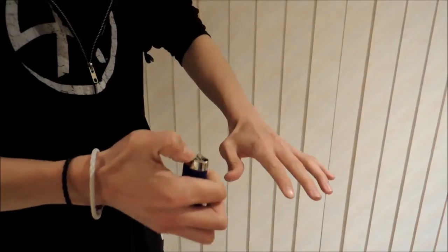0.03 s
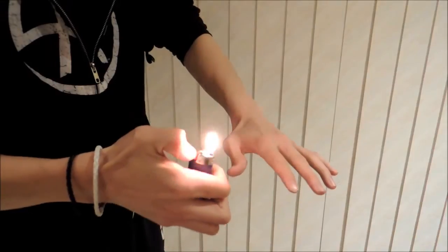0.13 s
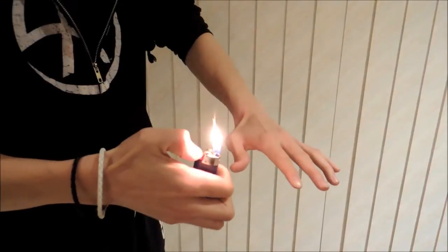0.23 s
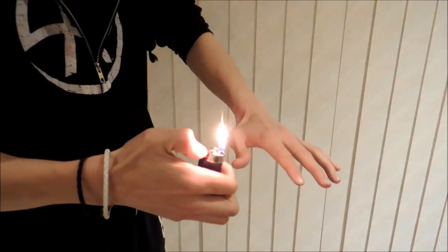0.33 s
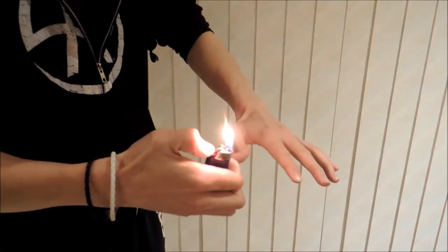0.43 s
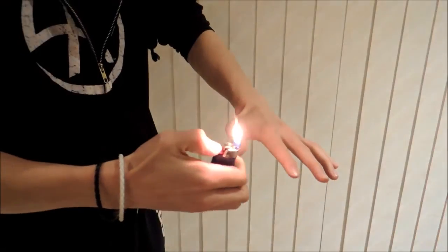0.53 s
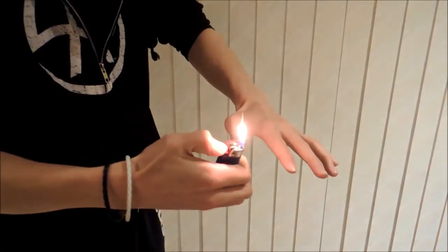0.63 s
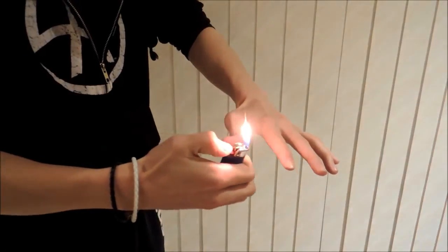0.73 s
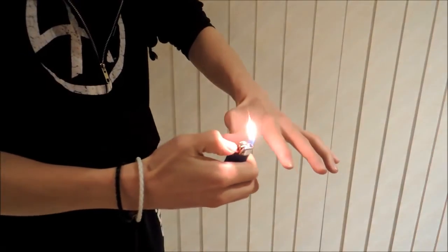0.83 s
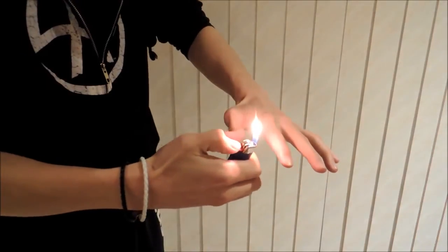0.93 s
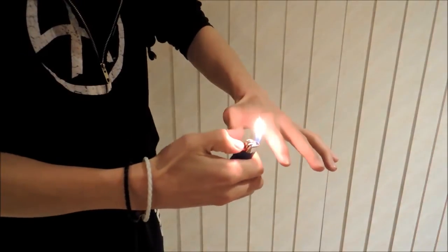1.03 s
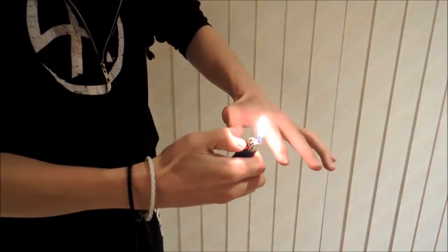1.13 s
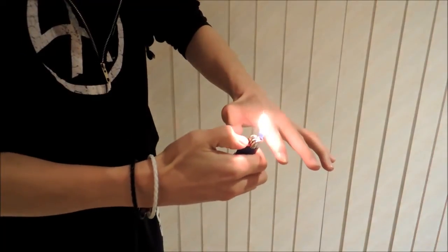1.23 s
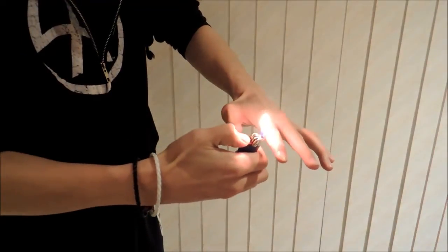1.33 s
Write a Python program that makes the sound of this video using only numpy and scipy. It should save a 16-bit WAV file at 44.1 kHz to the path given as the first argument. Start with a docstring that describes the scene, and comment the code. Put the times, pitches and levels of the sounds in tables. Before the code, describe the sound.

A thumb spins a lighter's spark wheel once near the start: a very short, bright, gritty rasp with a dull knock, then faint ticks and a soft hiss, close stereo microphone, small humming room.

```python
"""A small room, with a stereo microphone close to a lighter whose spark wheel a thumb spins once.
The teeth rasp over the flint in a few quick catches: swelling sines over noise, and grit that rings the hood.
A dull knock, a hollow ring, faint lever ticks (noise bursts) and a short faint hiss go with it.
Mains partials and banded room noise run throughout; faint short pitched blips, sines, sound further away."""
import sys
import numpy as np
from scipy import signal
from scipy.fft import rfft, irfft
from scipy.io import wavfile
from scipy.ndimage import uniform_filter1d

SR = 44100
rng = np.random.default_rng(int(sys.argv[2]) if len(sys.argv) > 2 else 0)


def transcribe(signal):
    """Save signal, clipped to [-1, 1], as a 16-bit WAV file at the path in sys.argv[1]."""
    frames = np.atleast_2d(signal).T
    limited = np.clip(frames, -1, 1)
    pcm = np.round(limited * 32767).astype(np.int16)
    wavfile.write(sys.argv[1], SR, pcm)


def level_to_linear(level):
    """Convert decibel levels to linear amplitude factors, elementwise."""
    exponent = np.asarray(level, float) / 20
    return 10 ** exponent


N = 61740


def at_hz(points, hz):
    """Read a spectrum on a log-frequency axis."""
    points = np.array(points)
    return np.interp(np.log(hz), np.log(points[:, 0]), points[:, 1])


def rms_one(x):
    """Scale to rms 1."""
    return x / np.sqrt(np.mean(x ** 2) + 1e-20)


def drift(rate_hz):
    """Slow random wander of rms about 1: noise through two equal poles, computed at every 40th sample."""
    r = np.exp(-2 * np.pi * rate_hz * 40 / SR)
    white = rng.standard_normal(N // 40 + 2002)
    slow = signal.lfilter([1], [1, -2 * r, r * r], white)[2000:]  # settled part only
    return np.interp(np.arange(N) / 40, np.arange(len(slow)), rms_one(slow))


def ring(clicks, hz, t60_s):
    """A two-pole resonator: a unit click sets a dying sine of starting height 1 ringing."""
    r = 10 ** (-3 / (t60_s * SR))
    w = 2 * np.pi * hz / SR
    return signal.lfilter([0, np.sin(w)], [1, -2 * r * np.cos(w), r * r], clicks + 1e-18)


def high_pass(x, hz):
    """Fourth-order high-pass."""
    return signal.sosfilt(signal.butter(4, hz, "high", fs=SR, output="sos"), x)


def pan(db):
    """Left and right gains that differ by db, left louder when positive."""
    return level_to_linear(db * np.array([[.5], [-.5]]))


def bands(gain, alike_at):
    """Half-octave bands of stereo noise, each with the gain and left-right likeness given for its pitch."""
    edges = 22 * 2 ** np.arange(0, 9.6, .5)
    white = rng.standard_normal((2, 2, N))
    out = 0
    for k, (low, high) in enumerate(zip(edges, edges[1:])):
        band = signal.butter(2, [low, high], "band", fs=SR, output="sos")
        mid, side = signal.sosfilt(band, white[k % 2])  # neighbouring bands take different noise
        hz = np.sqrt(low * high)
        alike = np.clip(alike_at(hz), 0, 1)
        stereo = np.sqrt(1 + alike) * mid + np.sqrt(1 - alike) * side * [[1], [-1]]
        out = out + gain(hz) * stereo
    return out


def spark_wheel():
    """Teeth catch and drag on the flint: pressure swells drive squeal, rasping noise and grit ringing the hood."""
    # Wheel teeth catching the flint. Each row: centre in seconds, swell height in relative dB,
    # squeal pitch in Hz, length in seconds (two standard deviations of the swell).
    catches = [(.2215, -33, 8600, .002), (.2248, -18, 8800, .0014), (.2275, -3.5, 8500, .0014),
               (.2297, 0, 8250, .0017), (.2319, -4, 11700, .0007), (.2340, -4, 12700, .0009),
               (.2362, -8, 6900, .0009)]
    # Resonances of wheel and metal hood under the grit. Each row: pitch in Hz, relative level in dB, t60 in seconds.
    hood = [(2950, -14, .005), (4600, -7, .002), (7000, 1.5, .003), (9600, -3, .002), (11600, 5, .002),
            (13200, 6, .002)]
    # The steady drag between catches, one row: start, full pressure and stop, all in seconds.
    drag_times = (.2175, .2285, .2372)
    drag_db, drag_rise_db = -1.5, 30.5
    squeal_wobble = .015  # share of the pitch
    rasp_db, rasp_side_db, rasp_low_hz = -14, -13, 2840
    grit_db, grit_spread_db, grit_per_s = -23, 1.7, 9000

    t = np.arange(N) / SR
    start, full, stop = drag_times
    still_to_rise = np.clip((full - t) / (full - start), 0, 1)
    pressure = level_to_linear(drag_db - drag_rise_db * still_to_rise) * (t > start) * (t < stop)
    squeal = np.zeros(N)
    for s, db, hz, length in catches:
        swell = level_to_linear(db) * np.exp(-.5 * ((t - s) / (.5 * length)) ** 2)
        wobble = 1 + squeal_wobble * np.sin(2 * np.pi * (t / (2 * length) + rng.random()))
        squeal += swell * np.sin(2 * np.pi * (np.cumsum(hz * wobble) / SR + rng.random()))
        pressure += swell

    rubbing = pressure * rng.standard_normal((2, N))
    rasp, side = level_to_linear(rasp_db) * high_pass(rubbing, rasp_low_hz)
    for hz, db, t60_s in hood:
        hits = rng.random(N) < grit_per_s / SR
        grit = hits * rng.choice([-1, 1], N) * level_to_linear(grit_spread_db * rng.exponential(1, N))
        rasp = rasp + level_to_linear(grit_db + db) * high_pass(ring(pressure * grit, hz, t60_s), .7 * hz)
    return squeal, rasp, level_to_linear(rasp_side_db) * side


def thumb():
    """One click sets off a dull knock of the plastic body, and a hollow body in the room that rings on."""
    click = np.zeros(N)
    click[int(.2291 * SR)] = 1
    knock = high_pass(ring(click, hz=900, t60_s=.0045), 70)
    hollow = ring(click, hz=1353, t60_s=.7)
    return level_to_linear(-9.5) * knock, level_to_linear(-45.5) * hollow


def ticks():
    """Dry ticks of the lever: sub-millisecond bursts of random-sign noise with the lows removed."""
    # Lever ticks. Each row: start in seconds, starting level in dB ahead of the high-pass.
    tick_starts = [(0.385, -31), (0.3985, -27), (0.4035, -29), (0.6249, -35), (0.7234, -30)]
    decay_s, low_hz = .00014, 5500  # decay to 1/e
    t = np.arange(N) / SR
    shape = np.zeros(N)
    for s, db in tick_starts:
        shape += level_to_linear(db) * (t >= s) * np.exp(-np.maximum(t - s, 0) / decay_s)
    return high_pass(shape * rng.choice([-1, 1], N), low_hz)


def puff():
    """One short hiss: high-passed noise that starts at once and dies exponentially."""
    start_s, start_db, t60_s, low_hz = .974, -46, .21, 10000
    t = np.arange(N) / SR
    shape = level_to_linear(start_db - 60 * np.maximum(t - start_s, 0) / t60_s) * (t >= start_s)
    return high_pass(shape * rng.standard_normal(N), low_hz)


def two_ports(x):
    """The right port hears a close source slightly later, duller and softer."""
    lag_us, dull_db_per_khz = 6, .1
    hz = np.arange(N // 2 + 1) * SR / N
    lag = np.exp(-2j * np.pi * hz * lag_us * 1e-6)
    right = irfft(rfft(x) * lag * level_to_linear(-dull_db_per_khz * hz / 1000), N)
    return np.array([x, right]) * pan(1.5)


def blips():
    """Distant sines hold briefly and leave a faint ring, the higher the more blurred; many weak ones are random."""
    # Placed blips. Each row: start in seconds, peak level in dB at the source, pitch in Hz, length in seconds.
    placed = [(0.115, -53.5, 2420, 0.018), (0.474, -59.5, 4340, .016), (0.521, -51, 1580, 0.011),
              (0.6, -60, 2220, 0.026), (0.609, -47.5, 1134, 0.018), (0.626, -56, 3400, 0.0097),
              (0.631, -51, 1098, 0.035), (0.709, -55.5, 3960, 0.025), (0.748, -48, 2060, 0.016),
              (.76, -52, 1950, 0.021), (0.797, -53, 1330, 0.021), (0.824, -49, 4660, 0.012),
              (0.832, -41.5, 1363, 0.025), (.845, -52, 1555, 0.017), (0.87, -53.5, 2300, 0.017),
              (.885, -54, 3730, 0.011), (0.992, -61, 3850, 0.03), (1.092, -50.5, 1684, 0.013),
              (1.117, -50.5, 2700, 0.018), (1.126, -58.5, 1597, 0.055), (1.203, -39, 1363, 0.032),
              (1.206, -52.5, 2480, .012)]
    # How strong the random blips are over time. Each row: time in seconds, added level in dB.
    busy = [(0, -20), (.14, 7), (.3, 4), (.45, -15), (.6, -4), (.74, 8), (.88, 3), (1.0, -6), (1.14, 4),
            (1.25, -4), (1.4, -3)]
    stray_per_s, stray_db, stray_low_hz, stray_high_hz = 440, -71, 1095, 5010
    rise_s, tail_db, tail_t60_s, blur_hz = .0057, -10, .58, 1.39

    stray = []
    for a, b, c, d in rng.random((int(stray_per_s * N / SR), 4)):
        s = a * N / SR
        db = stray_db + np.interp(s, *np.transpose(busy)) + 8 * (b - .5)
        hz = stray_low_hz * (stray_high_hz / stray_low_hz) ** c
        stray.append((s, db, hz, .016 + .0072 * d))

    out = np.zeros(N + SR)
    t = np.arange(SR // 6) / SR
    walk = np.cumsum(rng.standard_normal(N + SR))
    for s, db, hz, length in placed + stray:
        held = np.clip(np.minimum(t, length - t) / rise_s, 0, 1)
        tail = level_to_linear(tail_db - 60 * t / tail_t60_s) * np.clip(t / length, 0, 1) * (1 - t / t[-1])
        i = int(s * SR)
        smooth_walk = uniform_filter1d(walk[i:i + len(t)], size=64)
        blur = np.sqrt(2 * np.pi * blur_hz / SR) * (hz / 1000) ** 2 * smooth_walk  # phase in radians
        out[i:i + len(t)] += level_to_linear(db) * np.maximum(held, tail) * np.sin(2 * np.pi * hz * t + blur)
    return out[:N]


def room(x):
    """Reflections as stereo noise that dies band by band, after a short delay."""
    # Reflections by pitch. Each row: pitch in Hz, t60 in seconds, relative level in dB, left-right likeness (0 to 1).
    reflections = np.array([(501.7, 0.068, -5.5, 0.4), (1490, .25, 4, 0.74), (3440, 0.21, 5, 1),
                            (5960, 0.22, 0, 0.52), (8227, 0.193, 2.5, 0.59), (13940, 0.13, 2, 0.15)])
    delay_s = .0047
    t = np.arange(N) / SR - delay_s

    def column(hz, k):
        return at_hz(reflections[:, [0, k]], hz)

    def decay(hz):
        return (t > 0) * level_to_linear(column(hz, 2) - 60 * np.clip(t, 0, 1) / column(hz, 1))

    echo = bands(decay, lambda hz: column(hz, 3))
    echo = echo / np.sqrt(np.sum(echo ** 2) / 2)  # unit energy per channel on average
    return signal.fftconvolve(echo[:, :SR // 2], x[None], axes=1)[:, :N]


def hum():
    """Mains partials, the odd ones nearly peaking together as a buzz, each wavering and a little unlike by side."""
    # Hum partials. Each row: multiple of the mains pitch, rms level in dB about which it wavers, before panning.
    partials = [(1, -74), (2, -64.5), (3, -60), (4, -62.5), (5, -52), (6, -63.5), (7, -54.5), (8, -61),
                (9, -68), (10, -66), (12, -68), (16, -66)]
    mains_hz, waver_db, side_db = 60, .9, -20.5
    t = np.arange(N) / SR
    out = 0
    for k, db in partials:
        mid_phase = np.pi / 2 * (round(k) % 2) + rng.normal(0, .4)
        side_phase = 2 * np.pi * rng.random()
        turn = 2 * np.pi * mains_hz * round(k) * t
        side = level_to_linear(side_db) * np.sin(turn + side_phase) * [[1], [-1]]
        height = np.sqrt(2) * level_to_linear(db + waver_db * drift(4))
        out = out + height * (np.sin(turn + mid_phase) + side)
    return out


def air():
    """Room noise: stereo noise bands shaped by pitch, each slightly drifting in level, scaled as a whole."""
    # Spectrum of the room noise. Each row: pitch in Hz, relative density in dB.
    spectrum = [(12, -40), (20, 2), (223, -11.5), (302, -11.5), (433, -7), (656, -19), (940, -7.5),
                (1270, -22), (1390, -22), (1550, -17.5), (13400, -29), (15000, -54)]
    # How alike the two channels are. Each row: pitch in Hz, left-right likeness (0 to 1).
    likeness = [(30, 0.93), (180, 0.57), (540, 0.66), (1640, 0.49), (4920, 0.041), (14800, 0.98)]
    patchy_db = -.55

    def gain(hz):
        return level_to_linear(at_hz(spectrum, hz) + patchy_db * drift(4.9))

    return level_to_linear(-50.5) * rms_one(bands(gain, lambda hz: at_hz(likeness, hz)))


def scene():
    """Lighter close by, blips far off, hum and room noise; the squeal beams forward and feeds the room less."""
    squeal, rasp, rasp_side = spark_wheel()
    knock, hollow = thumb()
    near = rasp + knock + ticks() + puff()
    far = blips()
    to_room = level_to_linear(-10.5) * (near + level_to_linear(-4) * squeal) + level_to_linear(-9) * far
    wet = room(to_room) * pan(1)
    background = (far + hollow + hum() + air()) * pan(.44)
    return two_ports(near + squeal) + rasp_side * [[1], [-1]] + wet + background


def top_cut(x):
    """Nothing passes above the cut-off."""
    return signal.sosfilt(signal.butter(12, 15420, fs=SR, output="sos"), x)


def record(dry):
    """Gain control backs off around loud peaks and recovers slowly; then a steep treble cut and overload clipping."""
    from_db, ratio, recover_db_per_s = -19, .22, 7
    t = np.arange(N) / SR
    power = uniform_filter1d(np.mean(dry ** 2, axis=0), size=441)  # over 10 ms
    level_db = 10 * np.log10(power + 1e-12)
    over_db = ratio * np.maximum(level_db - from_db, 0)
    recovery_db = recover_db_per_s * t
    held_db = np.maximum.accumulate(over_db + recovery_db) - recovery_db
    levelled = dry * level_to_linear(-uniform_filter1d(held_db, size=882))  # gain smoothed over 20 ms
    treble_cut = signal.cheby2(16, 70, 14800, fs=SR, output="sos")  # order, stop-band dB, stop-band edge in Hz
    mix = np.clip(signal.sosfilt(treble_cut, levelled), -1, 1)
    return top_cut(mix)


dry = scene()
out = record(dry)
transcribe(out)
```